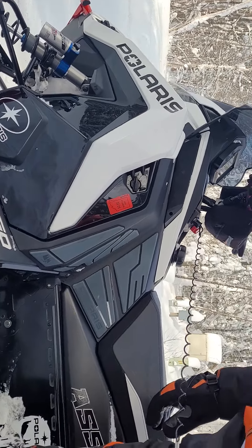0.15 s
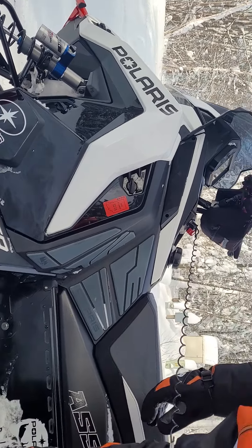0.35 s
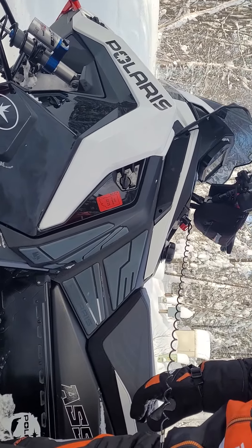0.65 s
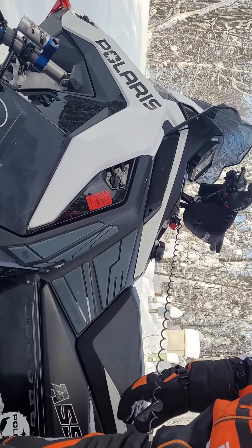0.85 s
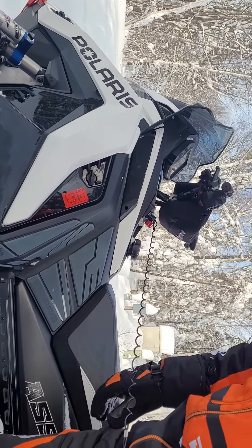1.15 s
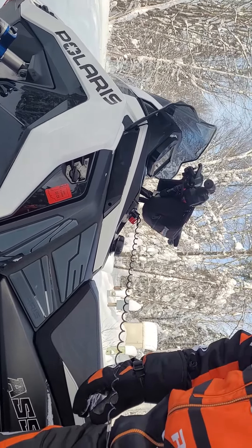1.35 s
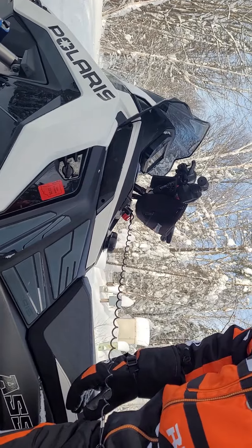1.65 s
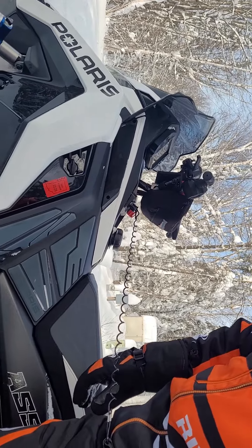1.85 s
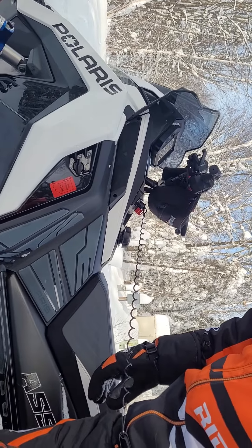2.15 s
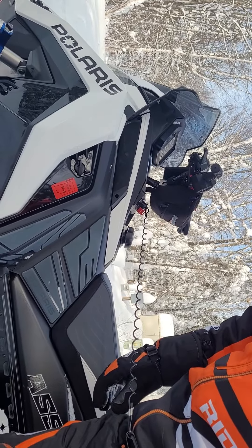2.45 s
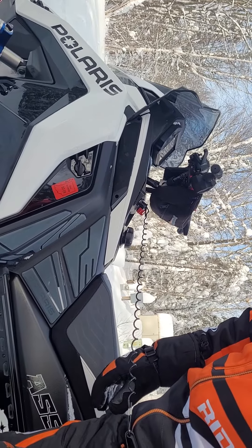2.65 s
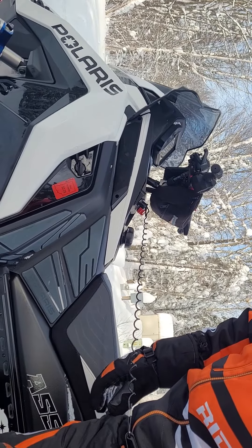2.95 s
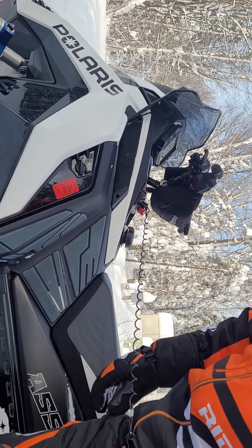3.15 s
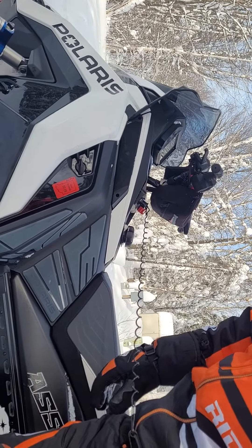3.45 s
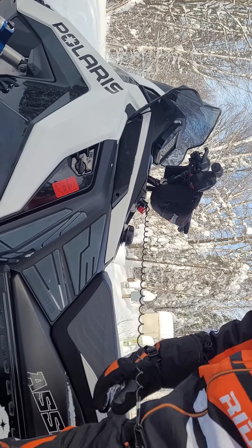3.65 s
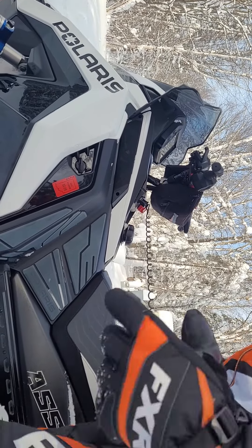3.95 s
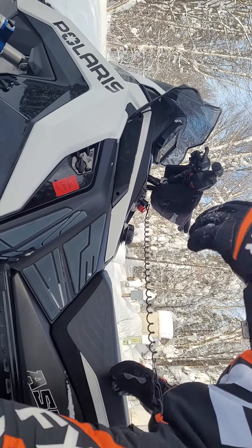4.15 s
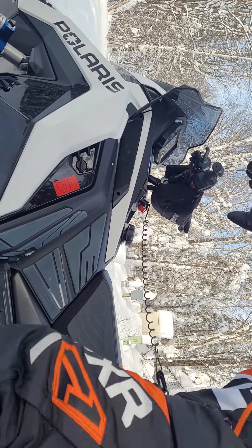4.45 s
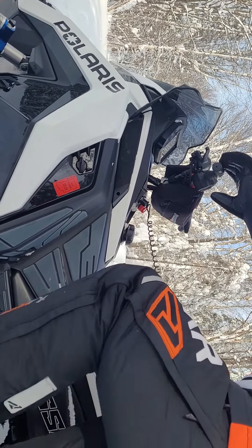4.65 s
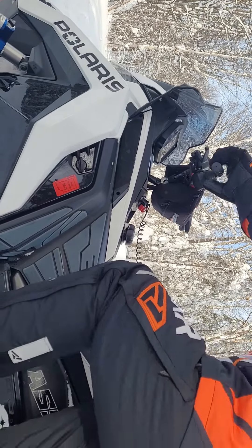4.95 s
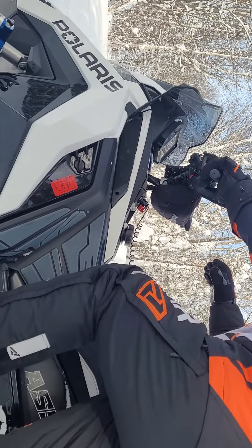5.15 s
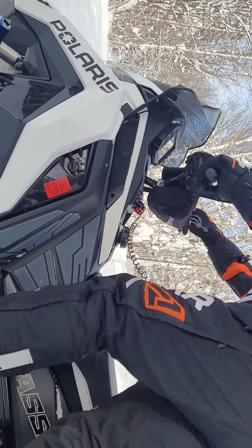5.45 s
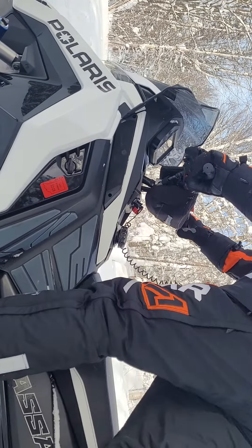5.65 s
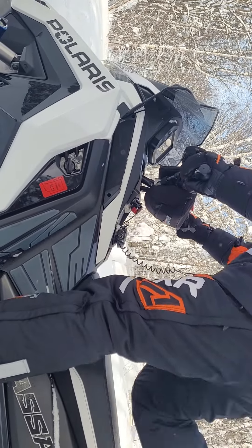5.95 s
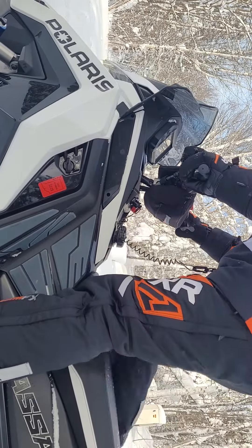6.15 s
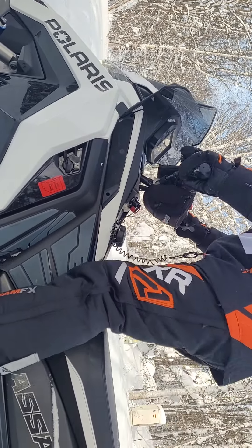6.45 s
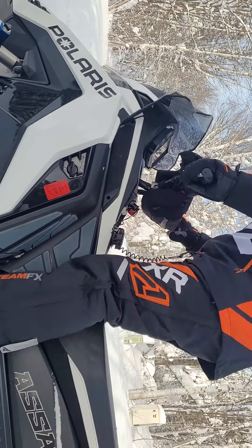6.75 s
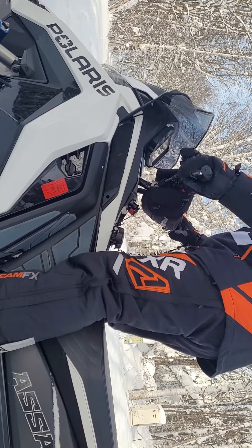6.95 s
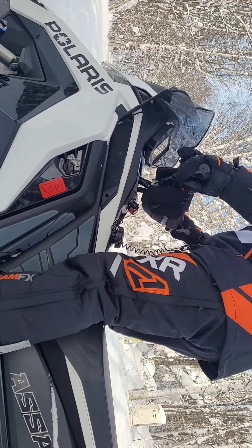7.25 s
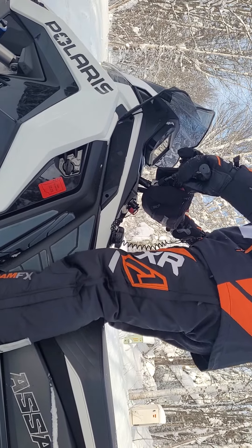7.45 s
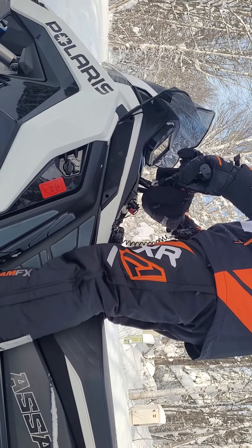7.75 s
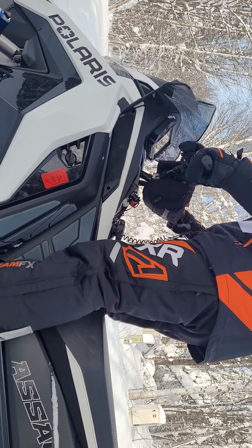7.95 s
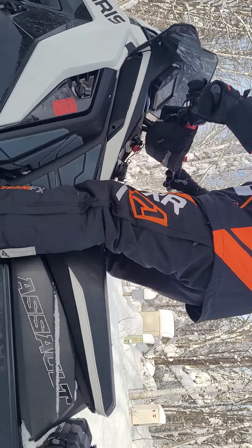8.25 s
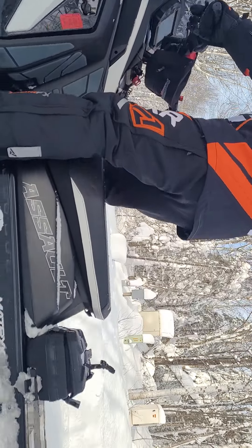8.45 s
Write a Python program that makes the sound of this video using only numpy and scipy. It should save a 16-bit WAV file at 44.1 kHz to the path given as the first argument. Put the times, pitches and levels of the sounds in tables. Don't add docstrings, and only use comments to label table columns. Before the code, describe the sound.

From 0 to 7 seconds a two-stroke twin snowmobile idles loudly and very close, outdoors and dry. A low hollow exhaust throb pulses nearly sixty times a second, with stronger burns popping irregularly every few strokes, giving a lurching, loping putter. Each pop shakes panels into gritty, metallic rattle and hiss, brighter toward the left; faint low air movement lies beneath. A dull double knock comes at 1.8, tiny ticks around 4.7, 5.2 and 6.8. At about 7.1 the throttle gives a short blip, then pitch climbs quickly through booming, stuttering firing until 7.7, nearly tripling by 8.2. From 7.3 belt and track roar swell in; intake drone, whine and port rasp grow. Loose parts click between 7.4 and 8.1. From 8.2 it is a smooth, hard buzzing drone, dipping slightly in pitch and easing as it pulls away, with clicks on the left near 8.55, ending still running.

```python
import sys
import numpy as np
from scipy import signal
from scipy.fft import rfft, irfft, next_fast_len
from scipy.io import wavfile
from scipy.ndimage import uniform_filter1d

SR = 44100
rng = np.random.default_rng(int(sys.argv[2]) if len(sys.argv) > 2 else 0)


def persist_wave(psi):
    counts = np.round(np.clip(psi, -1, 1) * 32767).astype(np.int16)
    wavfile.write(sys.argv[1], SR, np.atleast_2d(counts).T)


def decibels_to_gain(level_db):
    exponent = np.asarray(level_db, float) / 20
    return 10 ** exponent


N = 379701
PAD = next_fast_len(N + SR // 4) - N
LEAD = PAD * 3 // 4
TIME = np.arange(-LEAD, N + PAD - LEAD) / SR
FREQ = np.fft.rfftfreq(len(TIME), 1 / SR) + 1e-3

# time in seconds, crank speed in Hz, pumping level in dB.
REV = [(7.0, 28.14, -4.5), (7.106, 29.59, 0), (7.2, 33.39, -2), (7.38, 42.54, -6), (7.56, 53.56, -5),
       (7.686, 63.3, -2.5), (7.864, 74.78, -14.5), (8.13, 78.6, -11), (8.24, 82.2, -1.5), (8.44, 80.56, -1),
       (8.61, 77.2, -4.5)]
CRANK_HZ = np.interp(TIME, *np.transpose(REV)[:2])
IDLE_STROKES_HZ = 57.3
STEADY_S = 8.14


def curve(table, hz=FREQ):
    corner_hz, value = np.transpose(table)
    return np.interp(np.log(hz), np.log(corner_hz), value)


def unit(x):
    return x / np.sqrt(np.mean(x ** 2))


def pulses(s, size):
    out = np.zeros(len(TIME) + 2)
    at = np.clip((s - TIME[0]) * SR, 0, len(TIME))
    k = at.astype(int)
    np.add.at(out, k, size * (1 - at + k))
    np.add.at(out, k + 1, size * (at - k))
    return out[:-2]


def mode(hz, width):
    return 1j * FREQ * width / (hz ** 2 - FREQ ** 2 + 1j * FREQ * width)


def soft(ms):
    return 1 / (1 + 2j * np.pi * FREQ * ms / 1000) ** 2


def shape(x, response):
    return irfft(rfft(x) * response, len(TIME))


def walk(rate):
    k = int(SR / rate)
    held = np.repeat(rng.standard_normal(len(TIME) // k + 1), k)
    return unit(uniform_filter1d(held, k)[:len(TIME)])


def hiss(envelope, response):
    # frequency in Hz, likeness of the ports from 0 to 1.
    likeness = [(60, 0.97), (130, 0.99), (290, 0.96), (640, 0.77), (1410, 0.45), (3100, 0.08), (6820, 0.04),
                (15000, 0.05)]
    alike = np.clip(1.1 * curve(likeness) - .05, 0, 1)
    mid, side = rfft(rng.standard_normal((2, len(TIME))))
    mid = mid * np.sqrt(1 + alike)
    side = side * np.sqrt(1 - alike)
    return envelope * unit(irfft(np.array([mid + side, mid - side]) * response, len(TIME)))


def idle_burns():
    # start in seconds, first wait in strokes, second wait in strokes, number of burns.
    lopes = [(.0024, 5, 3, 4), (.262, 3, 5, 6), (.7105, 3, 5, 4), (.9386, 3, 3, 2), (1.0466, 5, 3, 4),
             (1.4116, 3, 5, 6), (1.7925, 2, 5, 3), (1.9689, 5, 2, 3), (2.1423, 3, 2, 4), (2.3689, 3, 3, 2),
             (2.4747, 5, 3, 4), (2.7332, 5, 3, 6), (3.1899, 3, 5, 4), (3.4125, 3, 3, 3), (3.5541, 5, 7, 3),
             (3.8182, 3, 5, 4), (4.1582, 8, 9, 3), (4.5624, 5, 3, 5), (4.8734, 5, 3, 2), (5.0499, 3, 5, 6),
             (5.4156, 3, 5, 4), (5.6388, 3, 5, 7), (6.085, 3, 5, 4), (6.3109, 3, 2, 4), (6.5368, 5, 3, 5),
             (6.9308, 3, 5, 2)]
    s, wait = [], []
    next_starts = [row[0] for row in lopes[1:]] + [None]
    for (start, first, second, count), after in zip(lopes, next_starts):
        gaps = np.resize([first, second], count)
        rate = IDLE_STROKES_HZ
        if after:
            whole = round((after - start) * rate)
            gaps[-1] = whole - gaps[:-1].sum()
            rate = whole / (after - start)
        s += list(start + np.r_[0, np.cumsum(gaps[:-1])] / rate)
        wait += list(gaps)
    return np.array(s), np.array(wait)


def idle_strength(wait):
    burn_db, carry_db_per_doubling, thin_db, scatter_db = -0.08, 3, -4, 1.5
    thin = np.roll(wait, shift=1) < 3
    scatter = scatter_db * rng.standard_normal(len(wait))
    return burn_db + carry_db_per_doubling * np.log2(wait / 4) + thin_db * thin + scatter


def crank(sag=0.86):
    s, wait = idle_burns()
    count = np.r_[0, np.cumsum(wait[:-1])]
    place = np.interp(TIME, s, np.arange(len(s)))
    k = np.minimum(place.astype(int), len(s) - 2)
    u = place - k
    idle = count[k] + np.diff(count)[k] * (u + sag * np.diff(s)[k] * u * (1 - u))
    idle = idle + np.minimum(TIME - s[0], 0) * IDLE_STROKES_HZ
    return idle + np.cumsum(2 * CRANK_HZ * (TIME > s[-1])) / SR


def burns(stroke_s):
    # start in seconds, stop in seconds, strokes per burn,
    # strength in dB, boom in dB.
    runs = [
        (7.095, 7.13, 2, 0.5, -12),
        (7.158, 7.35, 3, -3, -1),
        (7.378, 7.54, 3, -3, 2),
        (7.57, 7.58, 4, 1, -1),
        (7.602, 7.757, 4, 0, -1.5),
        (7.791, 8.125, 4, -3, -1.5),
        (8.403, 8.41, 4, -7, -3),
    ]
    s, wait = idle_burns()
    s, db = list(s), list(idle_strength(wait))
    boom = [0.] * len(s)
    for start, stop, every, run_db, boom_db in runs:
        first = np.argmin(np.abs(stroke_s - start))
        picked = stroke_s[first::every]
        s += [picked[0], *picked[1:][picked[1:] <= stop]]
        db += [run_db] * (len(s) - len(db))
        boom += [decibels_to_gain(boom_db)] * (len(s) - len(boom))
    throttled = np.array(boom) > 0
    uneven = decibels_to_gain(.9 * rng.standard_normal((2, len(s))) * throttled)
    return np.array(s), decibels_to_gain(np.array(db)) * uneven[0], np.array(boom) * uneven[1]


def exhaust(stroke_s, burn_s, burn_size, boom):
    # frequency in Hz, width in Hz, signed gain of a pumping stroke,
    # signed gain of a burn.
    pipe = [(68, 41.8, -1.5, -2), (107, 25.9, -6.5, -3.5), (114.9, 15, 12.5, 3), (141.9, 28, -3, 0.02),
            (154.34, 36.4, 2.5, 1.5), (225, 23, -0.71, 0.02), (261.4, 21, 0.21, 1.15),
            (288.8, 34, -0.07, -0.11), (341.4, 9.2, 0.57, 0.09), (390, 22.7, -0.9, -2.5)]
    rev_s, rev_hz, pump_db = np.transpose(REV)
    chance = rng.standard_normal((2, len(stroke_s)))
    chance = chance * (28 / np.interp(stroke_s, rev_s, rev_hz)) ** 1.5
    stroke_db = np.interp(stroke_s, TIME, np.interp(TIME, rev_s, pump_db) * (TIME > 7.0))
    size = decibels_to_gain(stroke_db + 1.4 * chance[0])
    pump = pulses(stroke_s - .012 + 0.00043 * chance[1], size)
    pump = pump + pulses(burn_s - .012, boom)
    blast = pulses(burn_s + 0.00033, burn_size)
    gas_db = -43.0 + 9 * (CRANK_HZ - 28) / 50 * (TIME < STEADY_S)
    gas = decibels_to_gain(gas_db) * decibels_to_gain(3.4 * walk(25)) * rng.standard_normal(len(TIME))
    pumped = sum(gain * mode(hz, width) for hz, width, gain, _ in pipe)
    pumped = pumped / (1 + (85 / FREQ) ** 6)
    blown = sum(gain * mode(hz, width) for hz, width, _, gain in pipe)
    outlet = soft(0.51) / (1 + (FREQ / 445) ** 12) / (1 + (38 / FREQ) ** 4)
    return 30 * (shape(pump, outlet * pumped) + shape(blast + gas, outlet * blown))


def clatter(burn_s, burn_size):
    # frequency in Hz, level in dB per Hz.
    body_noise = [(260, -34.5), (450, -6.5), (588, -4.5), (734, -2.5), (814, -6), (1200, -1.5),
                  (1920, -14.5), (2480, -14.5), (4040, -21), (7410, -25), (8350, -30.5), (11700, -26.5),
                  (15600, -29.5)]
    # frequency in Hz, width in Hz, level in dB.
    panels = [(1196, 82, -2.5), (2500, 45, -4), (3340, 45, -8.5), (3694, 69, -6), (4330, 52, -15),
              (5400, 120, -20), (7300, 300, -16.5)]
    level_db, db_per_s, db_per_octave = -44.5, 0.2, 2.8
    shake = shape(pulses(burn_s + 0.0031, burn_size ** 0.86), np.abs(soft(6.4))) * SR / 60
    octaves = np.clip(np.log2(CRANK_HZ / 28), 0, 1)
    level = decibels_to_gain(level_db + db_per_s * TIME + db_per_octave * octaves)
    color = decibels_to_gain(curve(body_noise))
    dull = hiss(level * decibels_to_gain(0.95 * walk(30)) * (1 + 0.59 * shake), color * np.abs(mode(720, 2500)))
    bright = hiss(level * decibels_to_gain(-11.5 + 1.6 * walk(30)) * (1 + 0.75 * shake),
                  color * np.clip(FREQ / 2500, 0, 1) ** 4)
    ringing = 0
    for hz, width, db in panels:
        late, hard, side = rng.standard_normal((3, len(burn_s)))
        size = 60 * burn_size * decibels_to_gain(2.2 * np.clip(hard, -3, 1) + .7)
        hit_s = burn_s + 0.0038 + .002 * late
        struck = [pulses(hit_s + .0003 * port * side, size) for port in (1, -1)]
        buzz = 0.36 * decibels_to_gain(4.2 * walk(6)) * rng.standard_normal((2, len(TIME)))
        ringing = ringing + decibels_to_gain(db) * rfft(struck + buzz) * mode(hz, width) * mode(hz, 4 * width)
    return dull + bright + level * decibels_to_gain(7.0) * irfft(ringing, len(TIME))


def breeze():
    return decibels_to_gain(-34.5) * unit(shape(rng.standard_normal((2, len(TIME))), mode(100, 130) ** 2))


def ticks():
    # time in seconds, peak in dB, left minus right in dB, centre in Hz, width in Hz.
    taps = [(0.133, -41.5, 4.5, 2995, 5000), (1.835, -22.5, 0.5, 1100, 1400), (1.836, -18.5, 1.5, 570, 160),
            (4.6957, -43.5, 3, 2000, 5100), (5.221, -40.5, 3.5, 4580, 1190), (5.291, -36, 4.5, 5030, 1500),
            (6.783, -38, 1, 5000, 9000), (7.4453, -32.5, 0, 2000, 6020), (7.8108, -26.5, 5.5, 2000, 5920),
            (7.905, -25.5, 1.5, 3000, 8100), (8.0226, -21.5, 3.5, 2000, 4920),
            (8.124, -25.5, 5.5, 2500, 3960), (8.5445, -25.5, 8, 4050, 9040), (8.5746, -23.5, 8, 3500, 5000)]
    decay_ms, tail = 3.3, 0.6
    out = np.zeros((2, N))
    t = np.arange(1024) / SR
    for s, db, pan_db, hz, width in taps:
        tap = tail * np.exp(-t * 1000 / decay_ms) * rng.standard_normal(len(t)) + 5 * (t == 0)
        body = signal.iirpeak(hz, hz / width, fs=SR)
        tap = signal.lfilter(*body, signal.lfilter(*body, tap)) * np.sqrt(9000 / width)
        start = int(s * SR)
        out[:, start:start + len(t)] += tap * decibels_to_gain(db + np.array([[pan_db], [-pan_db]]) / 2)
    return out


def rasp(stroke_s):
    level_db, uneven, hz, width_hz = -8.5, .6, 1400, 2600
    chance = rng.standard_normal((2, len(stroke_s)))
    cylinder = 1 + uneven * (-1.) ** np.arange(len(stroke_s))
    size = cylinder * decibels_to_gain(level_db + 1.5 * chance[0])
    size = size * (np.interp(stroke_s, TIME, CRANK_HZ) / 80) ** 3
    return shape(pulses(stroke_s + .00005 * chance[1], size), mode(hz, width_hz) ** 2)


def intake(strokes):
    # frequency in Hz, gain in dB.
    airbox = [(55, -31.5), (120, -10), (152, -20), (205, -39.5), (255, -20.5), (420, -21), (470, -36),
              (650, -48.5)]
    # crank order, level in dB.
    drone_orders = [(2, 1.5), (4, -2.5), (6, -0.5), (7, -13.), (8, -6.5)]
    # crank order, level in dB.
    whine_orders = [(1, -17), (3, -18.5), (9, -24), (12, -30.5), (14, -27.5), (15, -34), (16, -30),
                    (17, -31), (18, -35), (19, -27)]
    turn = np.pi * strokes
    opened = np.clip((TIME - 7.08) / 0.35, 0, 1)
    drone, whine = 0, 0
    for n, db in drone_orders:
        order_db = db + curve(airbox, n * CRANK_HZ) + 2.5 * walk(45) * (TIME < STEADY_S)
        drone = drone + decibels_to_gain(order_db) * np.sin(n * turn + n / 2)
    for n, db in whine_orders:
        whine = whine + decibels_to_gain(db + 1.0 * walk(21)) * np.sin(n * turn + n)
    return opened * drone + decibels_to_gain(-14) * (CRANK_HZ / 80) ** 4 * whine


def roar(burn_s, burn_size):
    # frequency in Hz, level in dB per Hz.
    roar_noise = [(290, -24), (500, -1), (522, -10), (727, -4.5), (851, -11.5), (1140, -10), (1770, -8),
                  (2400, -4.5), (2650, -7.5), (7470, -21), (8750, -27.5), (11500, -22), (15600, -29)]
    shake = shape(pulses(burn_s, burn_size), soft(1.7)) * SR / 120
    on = np.clip((TIME - 7.24) / .38, 0, 1) * (1 + 0.36 * shake)
    low = 1 / (1 + (FREQ / 2500) ** 4)
    track_db = -34.5 + 4 * np.minimum(np.log2(CRANK_HZ / 58), 0)
    track_db = track_db - 13.5 * np.maximum(TIME - 8.22, 0)
    belt_db = -37.5 + 12.5 * np.log2(CRANK_HZ / 80)
    color = decibels_to_gain(curve(roar_noise))
    track = hiss(on * decibels_to_gain(track_db + 2.5 + 0.95 * walk(22)), color * low)
    belt = hiss(on * decibels_to_gain(belt_db + 2.0 + 1.5 * walk(20)), color * (1 - low))
    return track + belt


def scene():
    # frequency in Hz, left minus right in dB.
    lean_db = [(60, -0.5), (110, -1.0), (200, -0.5), (380, -0.5), (700, 1.0), (1290, 0.5), (2380, 2.0),
               (4400, 5.0), (8120, 4.5), (15000, 4.0)]
    strokes = crank()
    whole_strokes = np.arange(np.ceil(strokes[PAD // 4]), strokes[-1])
    stroke_s = np.interp(whole_strokes, strokes, TIME)
    burn_s, burn_size, boom = burns(stroke_s)
    engine = exhaust(stroke_s, burn_s, burn_size, boom) + rasp(stroke_s) + intake(strokes)
    lagged = np.array([np.roll(engine, shift=1 * 5), engine])
    air = lagged + clatter(burn_s, burn_size) + breeze() + roar(burn_s, burn_size)
    lean = decibels_to_gain(curve(lean_db) / 2)
    return shape(air, np.array([lean, 1 / lean]))[:, LEAD:LEAD + N] + ticks()


def band_limit(x):
    return signal.sosfilt(signal.butter(12, 15710, fs=SR, output="sos"), x)


def record(dry):
    rounded = np.tanh(0.71 * dry) / 0.72
    return band_limit(rounded)


dry = scene()
out = record(dry)
persist_wave(out)
```